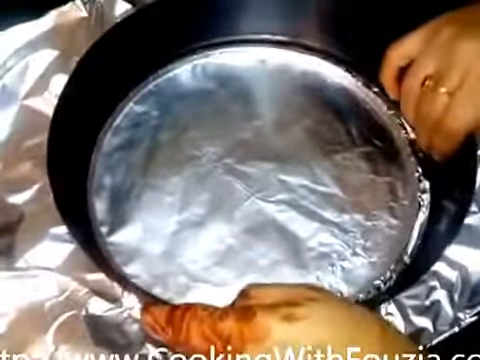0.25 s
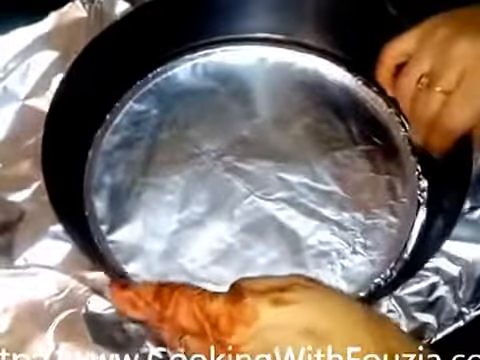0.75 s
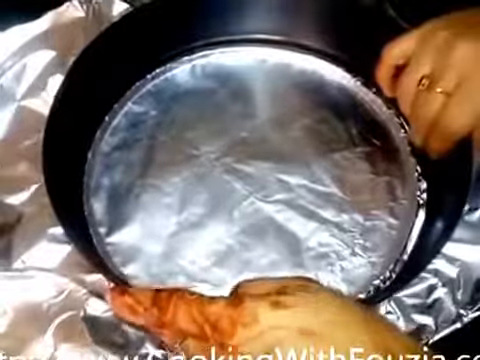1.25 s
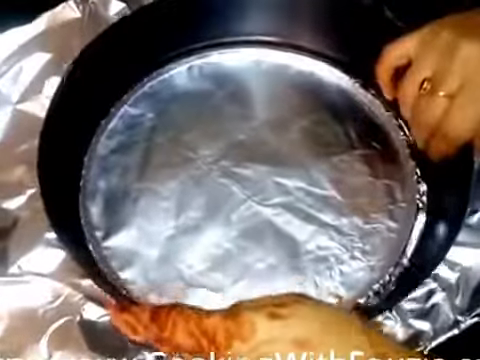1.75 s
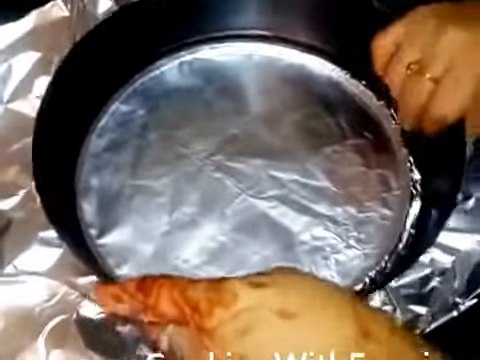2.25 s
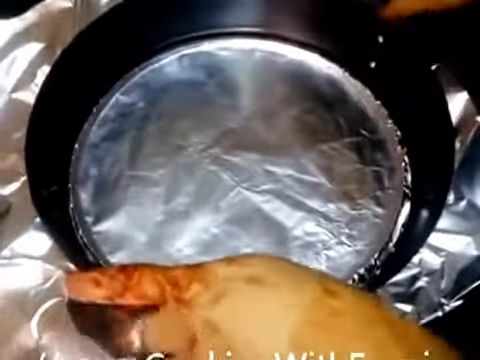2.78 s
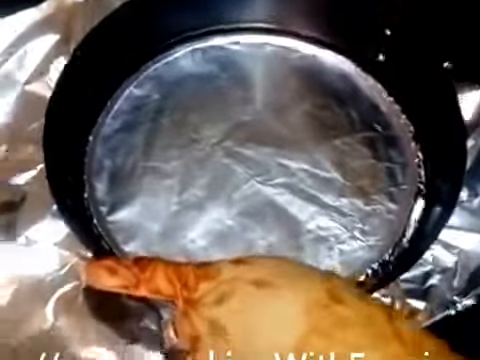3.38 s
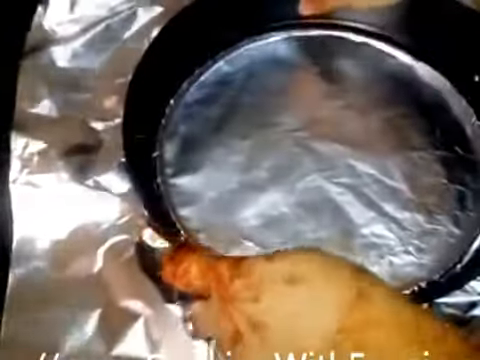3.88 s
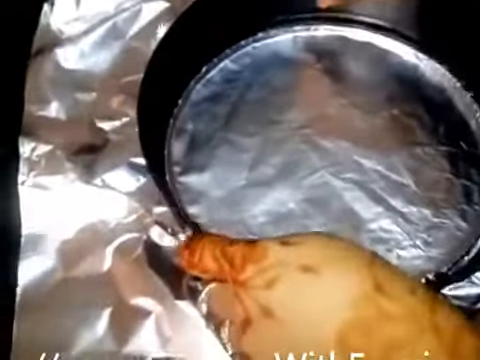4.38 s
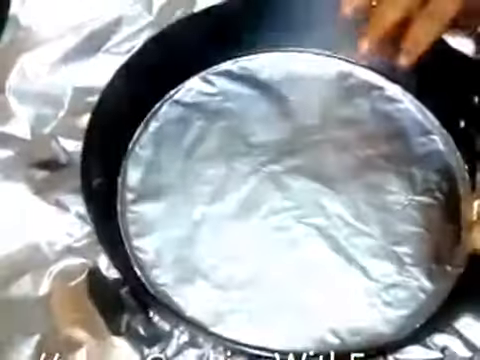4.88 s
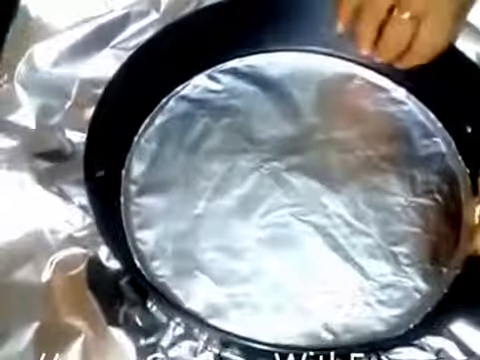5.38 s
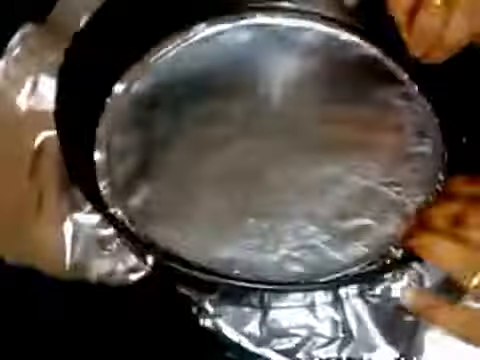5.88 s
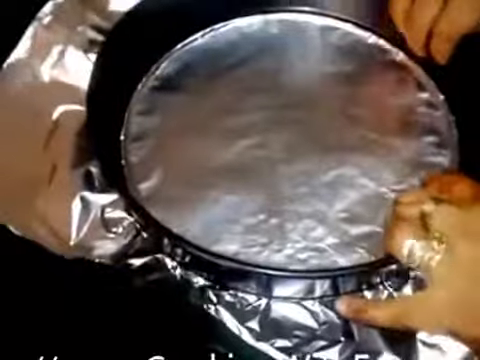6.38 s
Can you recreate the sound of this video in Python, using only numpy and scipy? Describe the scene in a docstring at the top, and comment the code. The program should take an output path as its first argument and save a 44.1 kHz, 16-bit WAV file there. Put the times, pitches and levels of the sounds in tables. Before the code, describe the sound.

Aluminium foil crinkles and snaps under pressing hands while a cake tin scrapes and knocks against a pan in a small, echoing kitchen.

```python
"""Aluminium foil crackles and snaps as hands press it around a cake tin standing in a pan.
Its creases buckle in swarms of tiny clicks and in single loud snaps. The tin scrapes and knocks
against the pan as it is shifted. The small, hard-walled kitchen echoes, a motor hums in the
background, and the loudest peaks overload the close microphone."""
import sys
import numpy as np
from scipy import signal
from scipy.fft import rfft, irfft
from scipy.io import wavfile
from scipy.ndimage import uniform_filter1d

SR = 44100
rng = np.random.default_rng(int(sys.argv[2]) if len(sys.argv) > 2 else 0)


def int16_out(signal):
    """Quantize to a 16-bit WAV file."""
    q = np.round(np.clip(np.atleast_2d(signal).T, -1, 1) * 32767)
    wavfile.write(sys.argv[1], SR, q.astype(np.int16))


N = 292383
TIME = np.arange(N) / SR


def from_db(db):
    """Turn decibels into a factor to multiply by."""
    return 10 ** (np.asarray(db) / 20)


def unit_power(x):
    """Scale a signal to an average power of 1."""
    return x / np.sqrt(np.mean(x ** 2) + 1e-20)


def at_hz(points, hz):
    """Read between the rows of a table, on a scale where all octaves are equally wide."""
    known_hz, values = np.transpose(points)
    return np.interp(np.log(np.maximum(hz, 1)), np.log(known_hz), values)


def dying(t60, size):
    """Fade away from 1; t60 is always the time in seconds to fall by 60 dB."""
    return np.exp(-np.log(1000) * TIME[:size] / max(t60, 1e-3))


def coloured(x, spectrum, size=4096):
    """Give a sound the tone colour of a table; white noise keeps its power."""
    gain = unit_power(from_db(at_hz(spectrum, np.linspace(0, SR / 2, size // 2 + 1))))
    # a minimum-phase filter: it never rings ahead of a click
    cepstrum = irfft(np.log(gain))[:size // 2]
    cepstrum[1:] *= 2
    return signal.fftconvolve(x, irfft(np.exp(rfft(cepstrum, size))))[:len(x)]


def resonate(x, hz, width_hz):
    """Ring at one pitch; a narrower width rings longer."""
    r = np.exp(-np.pi * width_hz / SR)
    feedback = [1, -2 * r * np.cos(2 * np.pi * hz / SR), r * r]
    return signal.lfilter(np.array([1, 0, -1]) * (1 - r * r) / 2, feedback, x + 1e-18)


def soften(x, corner_hz=5000):
    """Gently turn down the treble."""
    return signal.sosfilt(signal.butter(1, corner_hz, fs=SR, output="sos"), x)


def brighten(x, treble_db):
    """Turn the treble up or down: sharper creases sound brighter."""
    low = soften(x)
    return low + from_db(treble_db) * (x - low)


def add(track, time_s, sound):
    """Mix a sound in at the given time."""
    start = max(round(time_s * SR), 0)
    track[start:start + len(sound)] += sound[:N - start]


def gesture(start, attack_s, length_s, t60):
    """One hand movement rises, holds, and begins to fade length_s after its start."""
    rise = np.clip((TIME - start) / attack_s, 0, 1)
    return rise * from_db(-60 * np.clip((TIME - start - length_s) / t60, 0, 3))


def background(motor_hz=49.86, waver=0.58, waver_hz=7.4, hiss_db=-44.0):
    """A motor hums in slightly wavering tones over the hiss of the air."""
    # the motor's tones: (multiple of its turning rate, level [dB])
    motor_tones = [(2, -62.5), (4, -64.5), (5, -68), (6, -55.5), (7, -58.5), (8, -57.5), (10, -55.5),
                   (13, -60), (16, -63.5), (20, -62)]
    # tone colour of the hiss: (frequency [Hz], level [dB])
    hiss_colour = [(15, -34), (25, -22.5), (278, -6.5), (438, -10), (501, -2), (588, -13.5), (637, -11),
                   (833, -15.5), (1000, -11), (1150, -10), (1910, -9.5), (2180, -20), (3540, -15.5),
                   (6540, -31.5), (15000, -31.5)]
    hum = np.zeros(N)
    for multiple, db in motor_tones:
        hz = multiple * motor_hz
        tone = np.sqrt(2) * np.sin(2 * np.pi * (hz * TIME + rng.random()))
        flutter = unit_power(resonate(rng.standard_normal(N), hz, waver_hz))
        hum += from_db(db) * unit_power(tone + waver * flutter)
    return hum + from_db(hiss_db) * coloured(rng.standard_normal(N), hiss_colour)


def echoes(near_db=-3.5, near_t60=0.068, tail_db=-3.0, build_s=0.0034, size=22050):
    """Sound bounces quickly off pan and worktop, then lingers in the room; treble dies first."""
    # how long the kitchen echoes: (frequency [Hz], t60 [s])
    room_fade = [(200, .38), (1400, .44), (3500, .34), (8000, .31), (14000, .28)]
    white, hz = rfft(rng.standard_normal(size)), np.linspace(0, SR / 2, size // 2 + 1)
    edges = np.geomspace(40, SR / 2, 19)
    tail = np.zeros(size)
    for low, high in zip(edges, edges[1:]):
        band = irfft(white * (hz >= low) * (hz < high))
        tail += band * dying(at_hz(room_fade, np.sqrt(low * high)), size)
    tail *= 1 - np.exp(-TIME[:size] / build_s)
    near = rng.standard_normal(size) * dying(near_t60, size) * (TIME[:size] > .001)
    return (from_db(near_db) * unit_power(near) + from_db(tail_db) * unit_power(tail)) / np.sqrt(size)


def kitchen(x, spots=16, hold=256):
    """Every few milliseconds the sound comes from another spot around the tin, with its own echoes."""
    spot = np.repeat(rng.integers(0, spots, N // hold + 1), hold)[:N]
    shares = (uniform_filter1d((spot == k) * 1.0, size=hold // 2) for k in range(spots))
    return x + sum(signal.oaconvolve(x * share, echoes())[:N] for share in shares)


def tin_ring(low_cut_hz=251, size=16384):
    """Each touch rings the tin's tones in a different mix; the thin metal gives off little bass."""
    # the tin's natural tones: (frequency [Hz], level [dB], t60 [s])
    tin_tones = [(527, -16.5, 0.055), (663, -9, 0.03), (760, -15.5, 0.053), (845, -12.5, 0.081),
                 (1024, -16.5, 0.21), (1128, -9, 0.13), (1260, -17, 0.076), (1358, 3.5, 0.035),
                 (1390, -3.5, 0.053), (1570, -1, 0.051), (1768, 1.5, 0.028), (1950, -9, 0.014),
                 (2214, -6, 0.015), (2320, -29, 0.03), (2920, -5, 0.042)]
    ring = np.zeros(size)
    for hz, db, t60 in tin_tones:
        envelope = from_db(db + rng.normal()) * dying(t60, size)
        ring += envelope * np.sin(2 * np.pi * (hz * TIME[:size] + rng.random()))
    return signal.sosfilt(signal.butter(1, low_cut_hz, "high", fs=SR, output="sos"), ring)


def scrape(level_db=-9.0, slips_per_s=350, hand_t60=0.072):
    """The tin's rim sticks and slips on the pan; the hand that holds it shortens the ring."""
    # shoves of the tin across the pan: (start [s], length [s], level [dB])
    shoves = [(1.8, 0.087, -26.5), (1.966, 0.23, -34), (2.154, .21, -32), (2.46, 0.075, -32),
              (2.685, .14, -32), (2.892, 0.3, -32), (3.25, 0.074, -33), (3.356, 0.18, -29),
              (3.524, 0.13, -29), (3.694, 0.018, -19), (3.863, 0.018, -26), (4.07, 0.09, -30),
              (4.402, 0.12, -29), (4.595, .13, -34), (4.852, .05, -23.5), (4.954, 0.023, -15),
              (5.58, 0.079, -19.5), (5.83, 0.12, -23.5), (6.126, 0.089, -22)]
    speed = sum(from_db(db) * gesture(start, attack_s=0.0044, length_s=length, t60=0.12)
                for start, length, db in shoves)
    slips = rng.standard_normal(N) * (rng.random(N) < slips_per_s / SR)
    ring = tin_ring()
    rasp = signal.oaconvolve(slips, ring * dying(hand_t60, len(ring)))[:N]
    return from_db(level_db) * speed * unit_power(rasp)


def buckling(t60, crack, crack_t60, uneven_db=2.5, rise_s=.0003, size=8192):
    """A crease gives way: a first crack, then a fading run of tiny, uneven slips."""
    strengths = from_db(uneven_db * np.clip(rng.standard_normal(size // 32), -1.5, 1.5))
    slips = rng.standard_normal(size) * np.repeat(strengths, 32)
    rise = 1 - np.exp(-TIME[:size] / rise_s)
    envelope = rise * (dying(t60, size) + crack * dying(crack_t60, size))
    return unit_power(slips * envelope) * np.sqrt(np.mean(envelope ** 2))


def knocks():
    """The tin rings, the pan thuds on the worktop and foil is crushed; returns (metal, foil)."""
    # tin hitting pan: (time [s], ring [dB], thud [dB], crush [dB], t60 of the crush [s])
    hits = [(3.648, -19, -16.5, -1, 0.11), (5.0598, 1.5, -24, -3.5, 0.038), (5.129, -14.5, -42, -20, 0.27),
            (5.177, -15, -25, 0, 0.093), (6.143, -18, -20, -9, 0.24), (6.203, -15.5, -25.5, -8, 0.13)]
    # tone colour of the thud: (frequency [Hz], level [dB])
    thud_colour = [(30, -24), (100, -23), (200, -3.5), (270, 4.5), (400, 1), (550, 2), (750, -5.5),
                   (1500, -3.5), (5000, -47)]
    ring, thud, crush = np.zeros((3, N))
    for time_s, ring_db, thud_db, crush_db, t60 in hits:
        add(ring, time_s, from_db(ring_db) * tin_ring())
        add(thud, time_s, from_db(thud_db) * buckling(t60=0.063, crack=0.86, crack_t60=0.011))
        add(crush, time_s, from_db(crush_db) * buckling(t60, crack=0.51, crack_t60=0.018))
    # the foil between tin and pan softens the ring
    return soften(ring) + coloured(thud, thud_colour), crush


def sheet(clicks, level_db=-3.0):
    """The foil passes its clicks to the air, and the hollow under it rings along."""
    # tone colour of the foil: (frequency [Hz], level [dB])
    foil_colour = [(30, -58), (90, -38), (160, -26), (300, -11), (600, -12.5), (1000, -4.5), (1450, -1.5),
                   (1900, 0), (2300, -4.5), (3400, 1.5), (4500, -2.5), (6000, -4), (8300, -9.5),
                   (10500, -16), (15000, -19.5)]
    # tones of the hollow between foil and pan: (frequency [Hz], width [Hz], level [dB])
    hollow_tones = [(297, 42, 1.5), (1600, 137, -1), (2870, 440, -13.5), (3720, 93, -8.5),
                    (8120, 520, -8.5)]
    foil = coloured(clicks, foil_colour)
    hollow = sum(from_db(db) * resonate(foil, hz, width) for hz, width, db in hollow_tones)
    return from_db(level_db) * (foil + hollow)


def pressing():
    """Finger pushes swell, settle and add up; returns (effort as a factor, treble in dB)."""
    # pushes into the foil: (start [s], swell [s], t60 [s], level [dB], treble [dB])
    pushes = [ (0.0, 0.0064, 0.37, -21.5, -33), (.225, 0.015, .4, -39, -5), (.27, 0.033, .5, -37.5, -27),
              (.34, 0.078, 0.14, -33, -9), (0.441, 0.0076, 0.13, -26, -17), (0.719, 0.061, .15, -42, -10),
              (.875, 0.025, .4, -33.5, -23), (.96, 0.04, 0.24, -27.5, -15), (1.03, 0.1, 0.18, -39.5, -24),
              (1.335, .012, 0.18, -34, -22), (1.5, 0.021, 0.22, -39, -16), (1.79, 0.093, 0.44, -21, -8.5),
              (1.95, 0.019, 1, -33, -6), (2.12, 0.09, 0.33, -27, -11), (2.26, 0.049, 0.31, -23.5, -29),
              (2.369, .12, 0.41, -18, -11.5), (2.535, 0.013, 0.55, -15.5, -7),
              (2.714, 0.022, 0.44, -22.5, -13), (2.879, 0.025, 0.26, -19, -8),
              (2.955, 0.026, 0.57, -22.5, -0.5), (3.144, 0.011, 0.36, -24, -3.5),
              (3.26, 0.02, 0.46, -26, -7.5), (3.37, 0.067, 0.96, -24, -1),
              (3.498, 0.081, 0.76, -15.5, -4.5), (3.66, 0.031, 0.43, -16.5, -4.5),
              (3.719, 0.033, 0.51, -17.5, 3), (3.9, 0.031, 1, -31.5, 4.5),
              (3.994, 0.0218, 0.19, -17.5, -2.5), (4.07, 0.036, 0.78, -24, -8), (4.3, 0.086, 1, -33, -12),
              (4.41, 0.028, 0.48, -22, -3), (4.6, 0.17, 0.31, -24, -4), (4.755, 0.029, 0.17, -27.5, -9),
              (4.86, 0.022, 0.25, -24, -6.5), (4.946, 0.0099, 0.33, -22, -3),
              (5.52, 0.037, 0.53, -24.5, -6), (5.6, 0.077, 0.95, -14, -5.5),
              (5.811, 0.044, 0.61, -12, -6.5), (6.09, 0.05, 0.39, -10.5, -4),
              (6.17, 0.036, 0.57, -13, -0.5), (6.35, .035, 0.13, -18.5, -13)]
    power, treble = np.full(N, 1e-12), np.zeros(N)
    for start, swell_s, t60, db, treble_db in pushes:
        push = (from_db(db) * gesture(start, swell_s, swell_s, t60)) ** 2
        power += push
        treble += push * treble_db
    return np.sqrt(power), treble / power


def smeared(clicks, t60=0.029, size=1024):
    """A click bounces between the creases and becomes a short burst of the same tone colour."""
    bounces = rfft(rng.standard_normal(size) * dying(t60, size))
    burst = irfft(bounces / np.abs(bounces))[:size // 2]
    return signal.oaconvolve(clicks, burst)[:N]


def crinkle(level_db=-2.0, pops_per_s=900, spread_db=2.5, rub_db=-12, treble_db=5.0):
    """Tiny creases pop at random, faster and louder under pressure, while foil rubs on foil."""
    effort, push_treble_db = pressing()
    rate = pops_per_s * np.sqrt(10 * effort + 1e-4)  # equals pops_per_s at an effort of 0.1
    chance = np.clip(rate / SR, 0, 1)
    sizes = unit_power(from_db(spread_db * np.minimum(rng.exponential(1, N), 3.5)))
    signs = rng.choice([-1, 1], N)
    pops = sizes * signs * (rng.random(N) < chance) / np.sqrt(chance)
    # each pop rings one small flat patch of foil; a higher q gives a clearer pitch
    patches, patch_q, patch_db = 14, 3.9, 9.5
    patch_of_pop, swarm = rng.integers(0, patches, N), np.zeros(N)
    for k, hz in enumerate(np.geomspace(1200, 13000, patches)):
        clicks = smeared(pops * (patch_of_pop == k))
        swarm += clicks + from_db(patch_db) * resonate(clicks, hz, hz / patch_q)
    rub = from_db(rub_db) * rng.standard_normal(N)
    rustle = effort * (unit_power(swarm) + rub)
    return from_db(level_db) * brighten(rustle, treble_db + push_treble_db)


def snaps(level_db=-8.0, treble_db=9.0, patch_q=2.5, patch_share=.7):
    """A large crease snaps and very briefly rings the flat patch of foil next to it."""
    # large creases giving way: (time [s], level [dB], pitch of the patch [Hz], treble [dB])
    creases = [(0.028, -1.5, 2330, -35), (0.3501, -21, 3300, -24), (0.4401, -5.5, 3300, -5.5),
               (0.668, -27, 3280, -4.5), (0.795, -18.5, 3400, 7.5), (0.8803, -15, 2600, -12),
               (0.9628, -6, 3300, -30), (1.0144, -15, 3280, -24), (1.2077, -26.5, 4000, -24),
               (1.3393, -21.5, 1550, -25), (1.6834, -27, 1600, -5), (1.7861, -13, 3870, -6.5),
               (1.833, -5, 3670, -22), (1.9938, -16.5, 4900, 0.5), (2.3897, -17, 1570, -3),
               (2.4798, -9, 1660, -10), (2.5407, 1.5, 2750, -9), (2.731, -9.5, 1420, -7),
               (2.8166, -7, 3320, -7), (2.905, -9, 2980, -28), (3.114, -23.5, 1650, 8.5),
               (3.1546, -12.5, 3950, 6), (3.258, -11, 1600, -21), (3.2912, -12, 1740, -1),
               (3.372, -15, 4100, 0), (3.407, -10, 1260, -4), (3.526, -3, 1370, -11),
               (3.581, -13, 3610, -1), (3.8819, -8.5, 1960, -3), (4.0034, -19.5, 4230, 7),
               (4.1089, -10.5, 1410, -3.5), (4.192, -21.5, 3070, 5), (4.5192, -9.5, 1570, -15),
               (4.6334, -24, 6300, 5), (4.7352, -3, 3330, -5.5), (4.794, -17.5, 5800, 3.5),
               (4.9303, -10.5, 1530, -30), (4.9511, -10, 1620, -2), (5.4422, -18.5, 1500, -30),
               (5.5245, -13.5, 1910, -25), (5.592, 2.5, 2370, -1), (5.8229, 2.5, 2640, -19),
               (5.8485, 2.5, 2760, -25), (5.8772, -2.5, 1770, -4), (5.9906, -1.5, 2560, -10),
               (6.0945, -3.5, 1620, -12), (6.215, -5, 3000, -22), (6.388, 0, 3080, -4),
               (6.471, -7, 2550, -25)]
    track = np.zeros(N)
    for time_s, db, hz, crease_treble_db in creases:
        burst = buckling(t60=.04, crack=0.17, crack_t60=0.0032, uneven_db=4.0, rise_s=0.00089)
        burst += patch_share * resonate(burst, hz, hz / patch_q)
        add(track, time_s, from_db(db + level_db) * brighten(burst, treble_db + crease_treble_db))
    return track


def dip(time_s=4.824, depth_db=-16.5, recovery_s=0.014):
    """The level drops suddenly once and quickly comes back."""
    return from_db(depth_db * (TIME >= time_s) * np.exp(-np.abs(TIME - time_s) / recovery_s))


def scene():
    """Foil and tin echo in the kitchen, over the hum and hiss."""
    metal, crush = knocks()
    foil = sheet(crinkle() + snaps() + crush)
    handling = kitchen(foil + metal + scrape()) * dip()
    return (handling + background())[None]


def record(dry, ceiling=0.99, cutoff_hz=15050):
    """The microphone overloads, flattening the loudest peaks; the highest treble is cut off."""
    treble_cut = signal.ellip(10, .2, 70, cutoff_hz, fs=SR, output="sos")
    return signal.sosfilt(treble_cut, np.clip(dry, -ceiling, ceiling))


dry = scene()
out = record(dry)
int16_out(out)
```